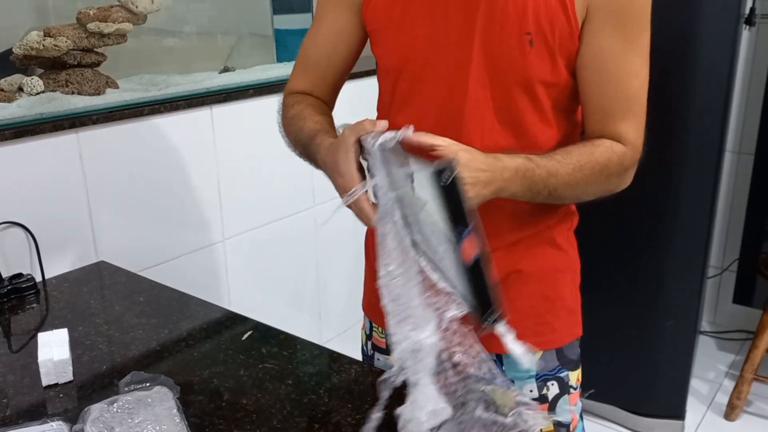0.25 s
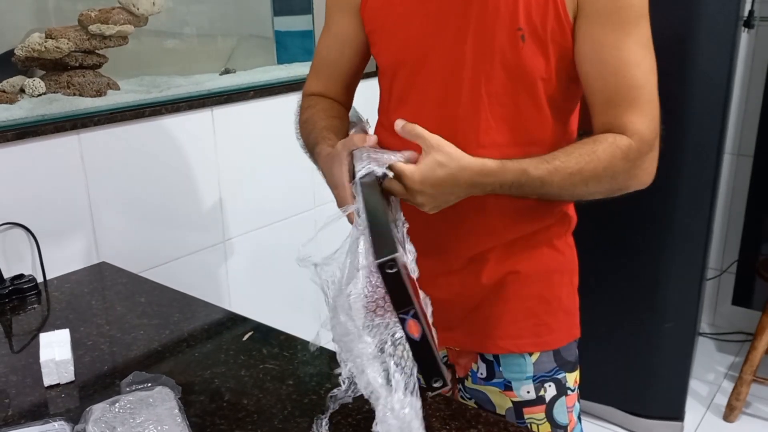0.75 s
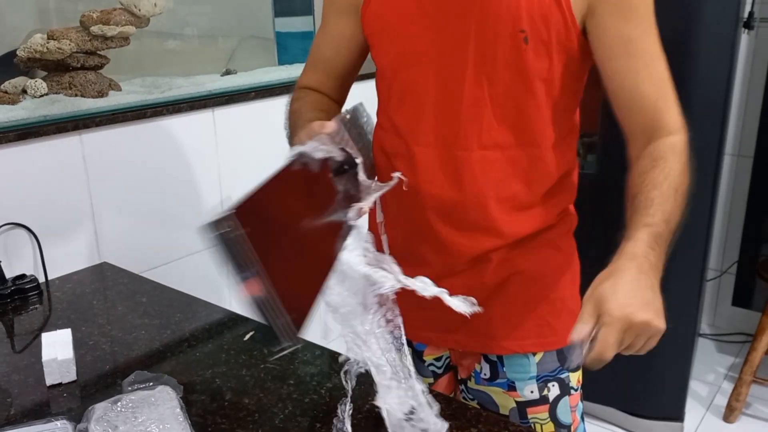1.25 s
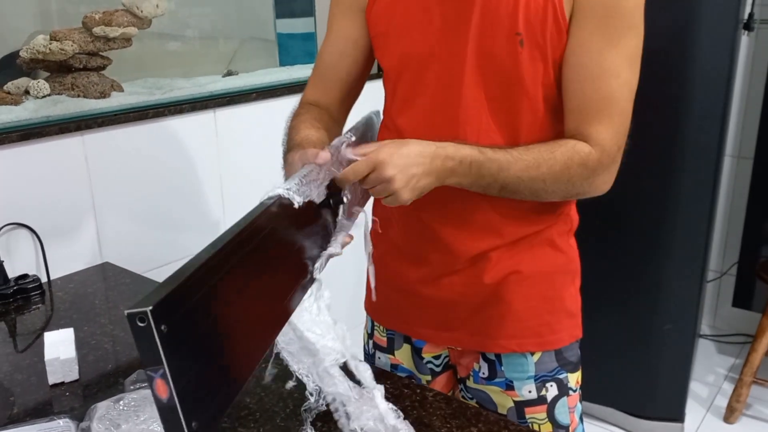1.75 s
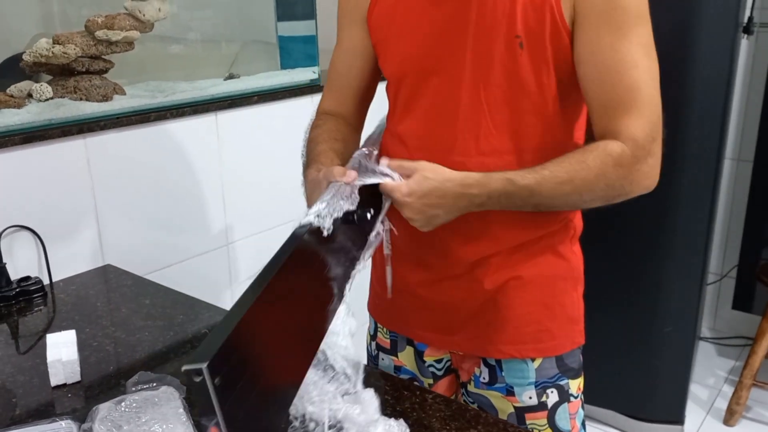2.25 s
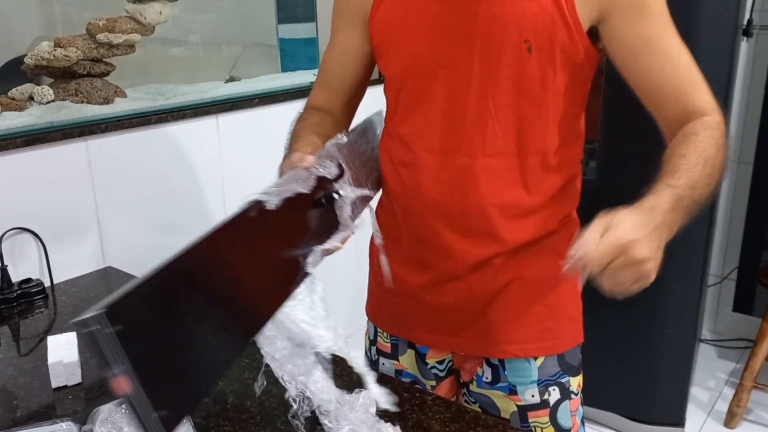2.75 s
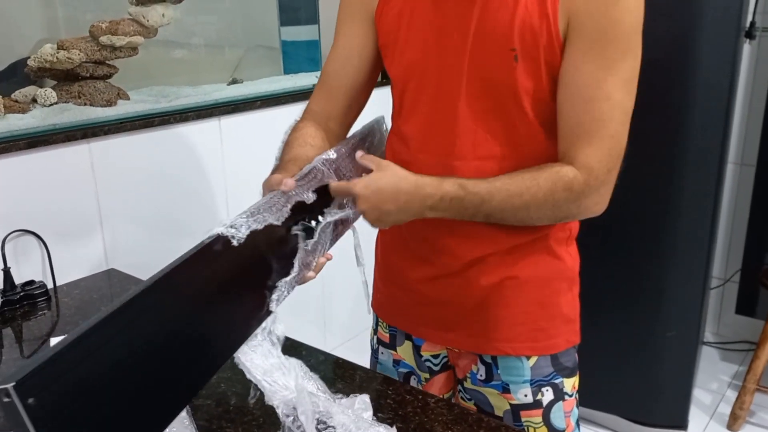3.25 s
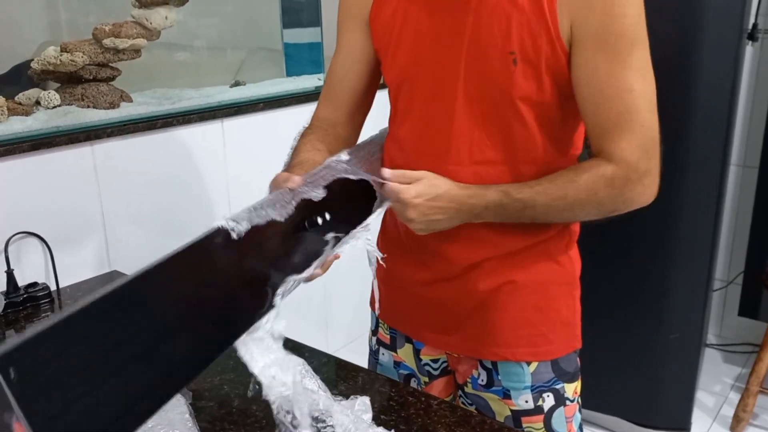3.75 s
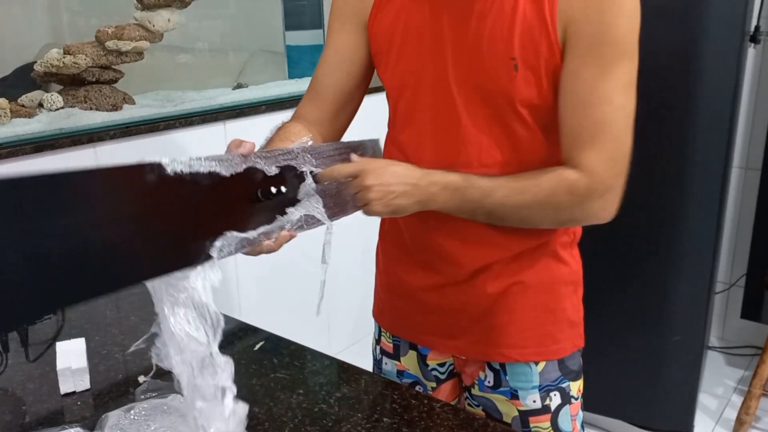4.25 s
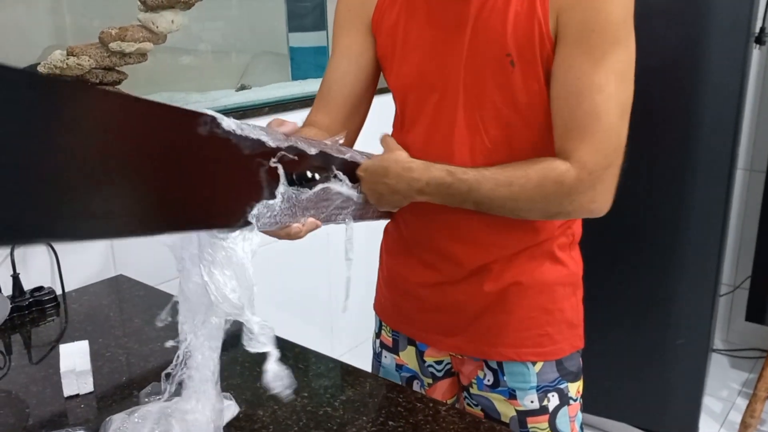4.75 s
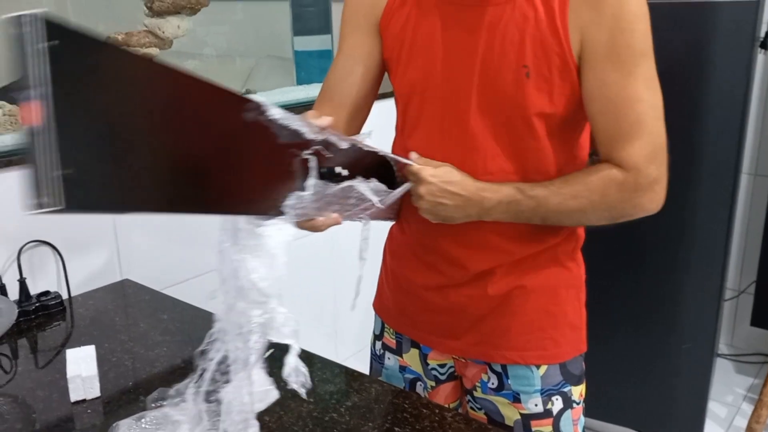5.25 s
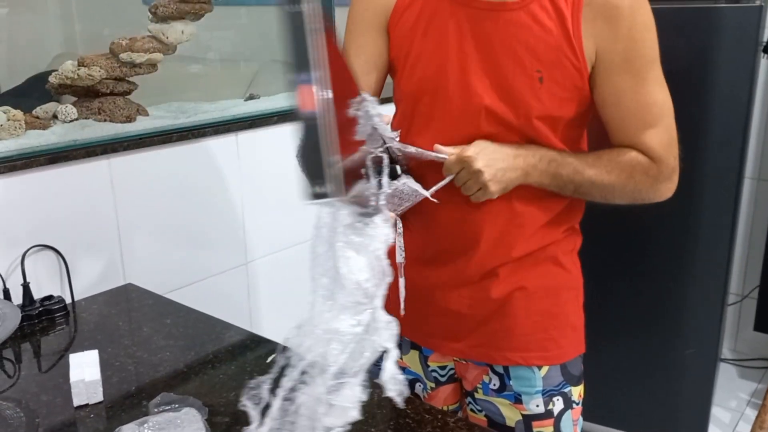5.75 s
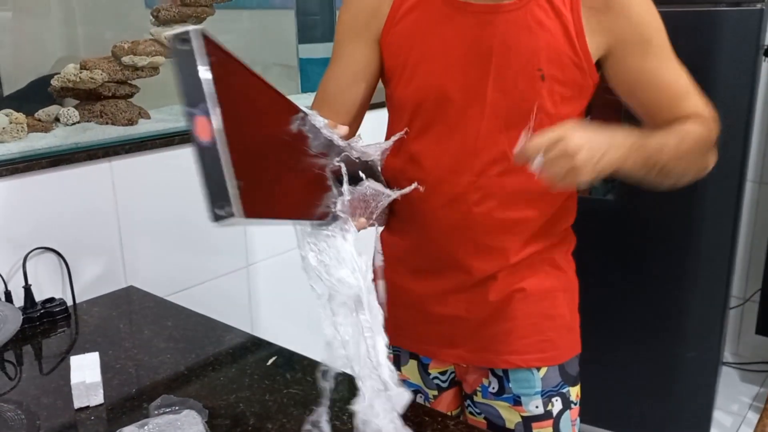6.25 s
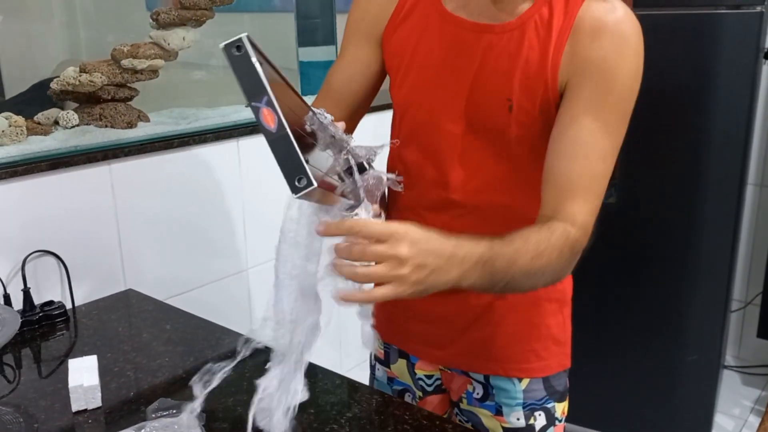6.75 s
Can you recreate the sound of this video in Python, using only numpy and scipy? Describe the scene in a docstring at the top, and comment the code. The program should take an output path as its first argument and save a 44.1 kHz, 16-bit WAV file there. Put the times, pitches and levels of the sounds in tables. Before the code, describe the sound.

Over the steady low hum of an aquarium pump, plastic wrapping is tugged off a panel in several pulls. An early flurry of rasps and snaps gives way to lighter crinkling, dry ticks, scattered snaps and soft hand bumps. Later, stronger snaps come with one brief ring from the panel, then a few last rustles. The handling is quiet and nearby, slightly to the left, and the hard tiled walls add a short reverberation.

```python
"""Packing film rustles faintly over an aquarium pump's hum, as hands pull it and bubble wrap off a
glass-faced panel in a tiled room. Creases buckle with crinkles and ticks, taut film rasps by stick-slip
friction, and the stretched film snaps. Hands knock the panel, which jerks when the film gives way
and rings once in its own modes as a strip lets go. The hard walls throw the handling back."""
import sys
import numpy as np
from scipy import signal
from scipy.fft import rfft, irfft
from scipy.io import wavfile
from scipy.ndimage import uniform_filter1d

SR = 44100
rng = np.random.default_rng(int(sys.argv[2]) if len(sys.argv) > 2 else 0)


def unload_audio(sound):
    """Save the sound as a 16-bit wav file, at the path given as the first command line argument."""
    columns = np.transpose(np.atleast_2d(sound))
    # keep every value between -1 and 1, then stretch to whole-number steps
    steps = np.round(np.clip(columns, -1, 1) * 32767)
    wavfile.write(sys.argv[1], SR, steps.astype(np.int16))


N = 309042


def amp(db):
    """Decibels to amplitude ratio."""
    return 10 ** (np.asarray(db) / 20)


def unit(x):
    """Normalisation to rms 1."""
    return x / np.sqrt(np.mean(x ** 2) + 1e-20)


def read(points, hz):
    """Interpolation along a log-frequency axis."""
    f, value = np.transpose(points)
    return np.interp(np.log(hz + 1), np.log(f + 1), value)


def add(mix, s, sound):
    """Superposition: a stereo sound joins the mix at time s."""
    part = mix[:, max(round(s * SR), 0):][:, :sound.shape[1]]
    part += sound[:, :part.shape[1]]


def bins(size):
    """Fourier frequencies for that many samples."""
    return np.fft.rfftfreq(size, 1 / SR)


def hump(hz, centre_hz, octaves):
    """Resonance: a bell curve of height 1 in log frequency."""
    return np.exp(-.5 * (np.log2((hz + 1) / centre_hz) / octaves) ** 2)


# Likeness of the direct sound in the two channels: f/Hz, correlation
COHERENCE = [(100, 0.72), (300, 0.91), (700, 0.37), (2000, 0.51), (6000, 0.073), (16000, 0.11)]

def colour(pair, db):
    """Minimum-phase filtering: two signals take a spectral shape and partial coherence, at rms 1."""
    size = pair.shape[1]
    log_gain = np.log(amp(np.maximum(db, -100)))
    mirrored = np.concatenate([log_gain, log_gain[-2:0:-1]])
    response = np.exp(np.conj(signal.hilbert(mirrored)))[:len(db)]
    a, b = rfft(pair)
    same = np.clip(read(COHERENCE, bins(size)), 0, 1)
    mid, side = a * np.sqrt(1 + same), b * np.sqrt(1 - same)
    return unit(irfft(np.array([mid + side, mid - side]) * response, size))


def crackle(size, per_s, spread_db, wash):
    """Shot noise: tiny random puffs of widely varying strength over a smooth slide."""
    strength = amp(spread_db * np.minimum(rng.exponential(1, size), 4))
    clicks = strength * (rng.random(size) < per_s / SR)
    power = signal.lfilter([1], [1, -np.exp(-1 / (0.00076 * SR))], clicks ** 2)
    return np.sqrt(power / (power.mean() + 1e-12) + wash) * rng.standard_normal((2, size))


def burst(envelope):
    """Whitening: noise under a short envelope is evened out to a flat spectrum."""
    size = len(envelope)
    spectrum = rfft(envelope * rng.standard_normal((2, size)))
    power = uniform_filter1d(abs(spectrum) ** 2, size=31, axis=1)
    fade = np.clip(3 - 4 * np.arange(size) / size, 0, 1)
    return fade * irfft(spectrum / np.sqrt(abs(power) + 1e-12), size)


# Pulls on the film: grab t/s, release t/s, grab level/dB, release level/dB, settling t/s,
# crinkle over fizz/dB
FILM_PULLS = [(0, 0.017, -52, -66, .15, -2), (0.218, 0.303, -67, -73, .2, -5),
              (.34, 0.96, -54, -37.5, 0.41, -3.5), (1.792, 2.425, -51.5, -47, 0.57, -3),
              (3.31, 3.665, -48, -48, 0.36, -4), (4.05, 4.19, -62.5, -61, .3, -3.5),
              (4.384, 5.16, -50.5, -43, 0.53, -5.5), (5.853, 5.912, -41, -44.5, 0.24, 3),
              (6.593, 6.65, -64, -70, 0.28, -15), (6.86, 6.97, -50, -49, .3, -0.5)]

def pull_level(slack_db=-93, reach_db_per_s=163, settle_db=18.5):
    """Incoherent sources add in power: the level in dB as each pull grips, tightens and settles."""
    t = np.arange(0, N / SR, .002)
    power = amp(slack_db) ** 2  # loose film never hangs quite still
    for grab, release, grab_db, release_db, settle_s, _ in FILM_PULLS:
        tension = np.clip((t - grab) / (release - grab), 0, 1) ** 1.42
        reach_db = reach_db_per_s * np.minimum(t - grab, 0)
        fall_db = settle_db * (np.maximum(t - release, 0) / settle_s) ** 2
        power = power + amp(grab_db + (release_db - grab_db) * tension + reach_db - fall_db) ** 2
    # creases give way in clumps
    clumps_db = 2 * unit(uniform_filter1d(rng.standard_normal(N), int(.04 * SR)))
    return np.interp(np.arange(N) / SR, t, 10 * np.log10(power)) + clumps_db


# Spectra of large creases, small creases and hands on the panel: f/Hz, relative level/dB
CRINKLE_SPECTRUM = [(40, -42), (200, -10), (700, -4), (1300, -1), (2500, 1.5), (4200, -0.5), (7000, -5.5),
                    (16000, -20)]
FIZZ_SPECTRUM = [(1500, -30), (4000, -12), (7000, -7.5), (12000, -2.5), (14500, -5), (16000, -6)]
GRIP_SPECTRUM = [(60, -22.5), (170, -7), (240, -4.5), (280, -0.5), (340, 2), (410, -3), (480, 0), (570, -3),
                 (660, -3.5), (850, -8), (1200, -15), (3000, -33)]

def rustle(level_db):
    """Buckling and friction: large creases crinkle, small ones fizz, and palms scuff the panel."""
    hz, pulls = bins(N), np.array(FILM_PULLS)
    creases = crackle(N, per_s=180, spread_db=3.6, wash=.2)
    wrinkles = crackle(N, per_s=380, spread_db=3.4, wash=.3)
    palms = crackle(N, per_s=100, spread_db=6.5, wash=0.93)
    crinkle_db = np.interp(np.arange(N) / SR, pulls[:, 1], pulls[:, -1])
    scuff_db = -51 + 0.31 * (level_db - level_db.max())
    crinkle = colour(creases, read(CRINKLE_SPECTRUM, hz)) * amp(level_db + crinkle_db)
    fizz = colour(wrinkles, read(FIZZ_SPECTRUM, hz)) * amp(level_db)
    scuff = colour(palms, read(GRIP_SPECTRUM, hz)) * amp(scuff_db)
    return crinkle + fizz + scuff


# Partials of the pump: f/Hz, rms level/dB
PUMP_PARTIALS = [(120, -47), (180, -61.5), (240, -61.5), (300, -66.5), (351, -64.5), (480, -61.5),
                 (674, -68)]

def pump_hum():
    """Forced vibration: the mains drives the aquarium pump, whose higher partials waver most."""
    t = np.arange(N) / SR
    knots = np.arange(0, 8, 1 / 6)
    hum = np.zeros(N)
    for hz, db in PUMP_PARTIALS:
        waver = np.interp(t, knots, rng.standard_normal(len(knots))) * hz / 1800
        phase = 2 * np.pi * (hz * t + rng.random()) + waver
        hum += np.sqrt(2) * amp(db) * (1 + waver) * np.sin(phase)
    return hum


# Background of the room: f/Hz, relative level/dB
WASH_SPECTRUM = [(20, -81), (32, -55), (50, -19), (80, -1.5), (160, 3.5), (200, -2), (330, -3), (520, -3),
                 (700, -6.5), (1000, -26), (2000, -23.5), (5000, -25.5), (13000, -36), (16000, -39)]

def room_wash(db=-54.5):
    """Stationary noise: the low, steady wash of the room."""
    return amp(db) * colour(rng.standard_normal((2, N)), read(WASH_SPECTRUM, bins(N)))


# Film dragged over an edge: t/s, rise t/s, level/dB, resonance f/Hz, its height/dB, fizz/dB
FILM_RASPS = [(0, 0.002, -53.5, 3000, 1, -5), (.452, 0.032, -33, 3080, 3.5, 0.5),
              (.784, 0.023, -35, 2940, 8, 0), (0.906, 0.034, -31, 2100, 10.5, -10),
              (1.029, 0.021, -23.5, 2700, 8, 0), (1.142, 0.01, -33.5, 2670, 10, 17),
              (1.177, 0.023, -30, 2540, 14, -4), (1.791, 0.02, -45.5, 2600, 1, 9),
              (2.5, 0.033, -27.5, 8000, 0, 1), (3.171, 0.0082, -40.5, 3570, 5.5, -3),
              (3.334, 0.016, -49, 2500, -3, 3), (3.785, 0.021, -36, 1900, 15.5, 2),
              (5.661, 0.027, -25, 1600, 4.5, 0.5), (6.211, 0.042, -34, 8000, -1.5, 6.5),
              (6.56, 0.044, -63, 1900, 8, 0), (6.87, 0.053, -39.5, 1870, 6, -1)]
# A rasp below its fizz: f/Hz, relative level/dB
RASP_SPECTRUM = [(50, -49), (300, -12), (1500, -7), (5000, -3)]

def rasps(size=16384, decay_s=0.025):
    """Stick-slip friction: dense grains swell and die, coloured by the taut strip's resonance."""
    out, t, hz = np.zeros((2, N)), np.arange(size) / SR, bins(size)
    for s, rise, db, centre_hz, height_db, fizz_db in FILM_RASPS:
        stroke = np.minimum(t / rise, 1) * np.exp(-np.maximum(t - rise, 0) / decay_s)
        fizz = [(8000, fizz_db - 2.5), (14000, fizz_db), (16000, fizz_db - 17)]
        tone = read(RASP_SPECTRUM + fizz, hz) + height_db * hump(hz, centre_hz, octaves=0.34)
        slips = crackle(size, per_s=900, spread_db=3.2, wash=.15)
        add(out, s, amp(db) * stroke * colour(slips, tone))
    return out


# Single creases flipping: t/s, level/dB, treble/dB
CREASE_TICKS = [(0.031, -61, -18), (0.5078, -37.5, -5.5), (.726, -41, -6), (1.6652, -58, 5),
                (1.779, -46, 8), (1.852, -37, 0), (2.807, -48.5, -21), (3.047, -58, 8), (3.248, -41.5, 13),
                (3.344, -42.5, -3), (3.362, -40, -3.5), (3.7924, -45, -11), (4.2085, -54, -22),
                (4.6027, -43, -15), (5.5947, -37.5, 10), (5.6252, -41.5, 2), (6.1683, -44.5, 4),
                (6.6617, -64, 6)]

def ticks(level_db, size=1024, strays_per_s=9, stray_treble_db=10):
    """Snap-through buckling: a lone crease flips with a dry tick; fainter ones flip at random."""
    out, t, hz = np.zeros((2, N)), np.arange(size) / SR, bins(size)
    flip = np.exp(-t / .0013)
    stray_db = level_db - 17 - 6.5 * rng.standard_normal(N)
    onsets = np.flatnonzero(rng.random(N) < strays_per_s / SR)
    strays = [(at / SR, stray_db[at], stray_treble_db) for at in onsets]
    for s, db, treble_db in CREASE_TICKS + strays:
        shape = [(200, -24), (1200, -7.5), (3000, -2), (11000, treble_db), (16000, treble_db - 2.5)]
        add(out, s, amp(db) * colour(burst(flip), read(shape, hz)))
    return out


# Hands bumping the panel: t/s, level/dB, knock f/Hz
HAND_BUMPS = [(.156, -52.5, 560), (.214, -56, 377), (.388, -53.5, 256), (.529, -52, 333),
              (.734, -49.5, 710), (.793, -49, 680), (.9, -57.5, 600), (1.322, -55, 835),
              (1.673, -50.5, 308), (2.106, -55, 396), (2.191, -41, 560), (2.575, -40.5, 339),
              (2.598, -47, 378), (3.119, -41.5, 353), (3.186, -55, 376), (3.82, -46, 640),
              (3.844, -43.5, 296), (4.294, -50, 466), (4.858, -51, 400), (5.226, -47.5, 626),
              (6.036, -49.5, 503), (6.048, -46, 310), (6.153, -54.5, 346)]

def bumps(size=8192, rise_s=0.0013, knock_s=0.0099, rattle_s=.06):
    """Damped impact: a soft hand gives the held panel a dull knock, and it rattles briefly."""
    out, t, hz = np.zeros((2, N)), np.arange(size) / SR, bins(size)
    push = (1 - np.exp(-t / rise_s)) * (np.exp(-t / knock_s) + 0.26 * np.exp(-t / rattle_s))
    for s, db, pitch_hz in HAND_BUMPS:
        tone = read(GRIP_SPECTRUM, hz) + 6 * hump(hz, pitch_hz, octaves=.5)
        add(out, s, amp(db) * colour(burst(push), tone))
    return out


# Film snapping: t/s, level/dB, body/dB, treble/dB, resonance f/Hz, its height/dB, room send/dB
FILM_SNAPS = [(0.7685, -29.5, -10, 3, 4650, 10, -2), (.7806, -31.5, -8, 0.5, 3420, 3.5, 3.5),
              (.7954, -33, 6.5, 0, 2390, 13, -1.5), (0.8974, -26, -5.5, -4, 2000, 5, -1.5),
              (1.0035, -27.5, 5, 9.5, 2440, 14, -1.5), (1.0283, -24, -9.5, -2, 2760, 9.5, -1.5),
              (1.8214, -43.5, -21, -22, 2600, 13, -9), (1.841, -41, -12, 11, 2540, 8, 0),
              (2.105, -48, 0, -9, 2620, 5.5, 4.5), (2.1677, -27, -7, -7.5, 6760, 9.5, -2.5),
              (2.193, -34, 2.5, -3, 1230, -2.5, 6), (2.1955, -31.5, 3, 7, 654, -8, -1.5),
              (2.476, -29, -6.5, -5.5, 3760, 5, -1), (2.561, -39, 7, -26, 2220, 7.5, 4.5),
              (3.1166, -45.5, 18, 1, 1000, -3, -0.5), (3.563, -38.5, 0, -15.5, 1930, 5.5, 1.5),
              (3.641, -41, 8, 13, 1360, 9, 1), (3.842, -41, 5, -12, 1310, 7.5, -2.5),
              (4.57, -42.5, -13, 9, 2920, 7, -4), (4.825, -38, -17, -9, 1210, 13.5, 1),
              (4.858, -39, -1, -13, 2360, 5, 0), (4.952, -30, 2, -4, 1810, 3.5, -3),
              (5.1694, -29.5, 0.5, -0.5, 1330, 4.5, -0.5), (5.217, -25.5, -5.5, -3.5, 2730, 0.5, 0),
              (5.8209, -27.5, -3, -5, 1480, 2.5, -7.5), (5.8294, -25, 0, 6.5, 3750, 4, -0.5),
              (5.931, -44, 14.5, 12, 2410, 15, 5.5)]
# Spectrum common to the snaps: f/Hz, relative level/dB
SNAP_SPECTRUM = [(60, -34), (250, -14.5), (600, -1.5), (1300, 0), (2500, -1), (5000, -1.5), (9000, -3.5),
                 (14000, -3), (16000, -9)]

def snaps(size=2048, crack_s=.0012, flutter_s=0.005, echo_s=0.001464):
    """Sudden release of tension: a crack, then slack film flutters. Gives direct sound and room send."""
    direct, send = np.zeros((2, 2, N))
    t, hz = np.arange(size) / SR, bins(size)
    click = np.array([t == 0, 0 * t])  # summed over all directions, the room gets one clean crack
    comb = np.cos(2 * np.pi * hz * echo_s) * np.exp(-hz / 5000)  # the panel's echo interferes
    for s, db, body_db, treble_db, centre_hz, height_db, room_db in FILM_SNAPS:
        length_s = crack_s * 2 ** (-treble_db / 12.5)  # a brighter crack is a quicker one
        envelope = np.exp(-(t / length_s) ** 4) + 0.31 * np.exp(-t / flutter_s)
        tilt = [(900, body_db), (2000, 0), (3000, 0), (5500, 0.67 * treble_db), (11000, treble_db)]
        resonance = height_db * hump(hz, centre_hz, octaves=0.22)
        tone = read(SNAP_SPECTRUM, hz) + read(tilt, hz) + comb + resonance
        add(direct, s, amp(db) * colour(burst(envelope), tone))
        add(send, s, amp(db + room_db) * colour(click, tone))
    return direct, send


# Jerks of the freed panel: t/s, level/dB
PANEL_LURCHES = [(0.782, -59), (2.586, -58), (3.83, -57), (5.211, -59), (5.822, -54.5), (6.041, -70)]

def lurches(size=16384):
    """Piston radiation: as the film gives way, the broad panel pushes out a soft, deep puff."""
    out, t = np.zeros((2, N)), np.arange(size) / SR
    tone = read([(20, -41), (45, -25), (75, -3), (140, 1), (400, -10), (1500, -88)], bins(size))
    shove = t * np.exp(-t / 0.011)
    for s, db in PANEL_LURCHES:
        add(out, s, amp(db) * colour(burst(shove), tone))
    return out


# The strip that plucks the panel: t/s, level/dB
PANEL_PLUCKS = [(5.216, -33)]
# Mode clusters of the panel: f/Hz, width/Hz, relative level/dB, T60/s
PANEL_MODES = [(418, 31, -8, 0.98), (1080, 290, 0.5, 0.61), (1810, 80, 0.5, 0.69), (1690, 120, -5.5, 0.75),
               (2600, 630, 12, 0.14)]

def panel_ring(count=7):
    """Free vibration: close modes beat and decay after a strip tears free of the panel."""
    out, t = np.zeros((2, N)), np.arange(SR) / SR
    for s, db in PANEL_PLUCKS:
        for hz, width_hz, mode_db, t60 in PANEL_MODES:
            modes = hz + width_hz * ((np.arange(count) + rng.random(count)) / count - .5)
            phases = rng.random((count, 1)) + .3 * rng.random((2, count, 1))
            ring = np.sin(2 * np.pi * (modes[:, None] * t + phases)).sum(axis=1) / np.sqrt(count)
            add(out, s, amp(db + mode_db - 60 * t / t60) * ring)
    return out


# Reverberation time of the tiled room: f/Hz, T60/s
REVERB_TIME = [(150, 0.46), (500, 0.63), (1500, 0.62), (4000, 0.59), (8000, 0.42), (16000, 0.37)]

def wall_response():
    """Reverberation: sparse early reflections thicken into a tail whose treble dies first."""
    t = np.arange(SR) / SR
    density = np.clip((t / .025) ** 2, .1, 1) * (t > .003)
    taps = rng.choice([-1, 1], (2, SR)) * (rng.random((2, SR)) < density) / np.sqrt(density + 1e-6)
    hz, at, spectra = signal.stft(taps, SR, nperseg=256)
    hz = hz[:, None]
    same = 1 / (1 + (hz / 560) ** 3)  # long waves reach both channels alike
    spectra[1] = same * spectra[0] + np.sqrt(1 - same ** 2) * spectra[1]
    tone = read([(100, -4.5), (500, 0.23), (2500, 0.4), (8000, 1.8), (16000, 0.33)], hz)
    spectra *= amp(tone - 60 * at / read(REVERB_TIME, hz))
    tail = signal.istft(spectra, SR, nperseg=256)[1][:, :SR]
    return unit(tail) / np.sqrt(SR)


def reflections(x, count=5, places_per_s=9):
    """Time-varying convolution: the hands move, so one pattern of reflections fades into the next."""
    place = np.arange(N) / SR * places_per_s
    out = np.zeros((2, N))
    for k in range(count):
        away = np.minimum(abs((place - k) % count - count / 2), 1)
        out += signal.fftconvolve(x * np.cos(np.pi / 2 * away), wall_response(), axes=1)[:, :N]
    return out


def scene():
    """Superposition: the handling, direct and reflected, over the hum and the wash."""
    snap, snap_send = snaps()
    level_db = pull_level()
    steady = pump_hum() + room_wash()
    panel = panel_ring() + lurches()
    handling = rustle(level_db) + rasps() + bumps() + ticks(level_db)
    reverberant = reflections(snap_send + amp(0.5) * handling)
    return snap + amp(-1) * handling + panel + reverberant + steady


# Channel balance: f/Hz, left over right/dB
CHANNEL_BALANCE = [(100, 3), (300, 1.5), (2000, 2), (4000, 0.7), (8000, 1.5), (16000, 2)]

def record(dry, cutoff_hz=16100):
    """Clipping and band limiting: the sound leans left, clips at full scale and is low-passed."""
    lean_db = read(CHANNEL_BALANCE, bins(N)) / 2
    leaning = irfft(rfft(dry) * amp([lean_db, -lean_db]), N)
    lowpass = signal.firwin(401, cutoff_hz, window=("kaiser", 8), fs=SR)
    return signal.oaconvolve(np.clip(leaning, -1, 1), lowpass[None], "same")


dry = scene()
out = record(dry)
unload_audio(out)
```